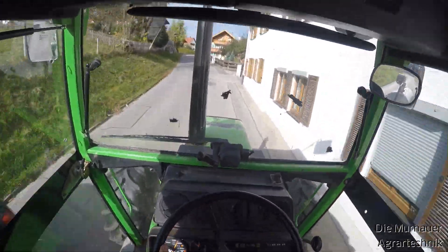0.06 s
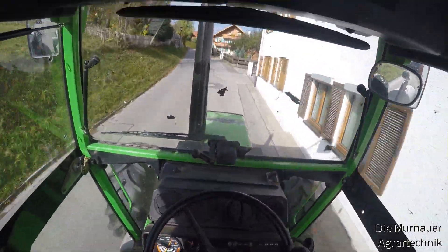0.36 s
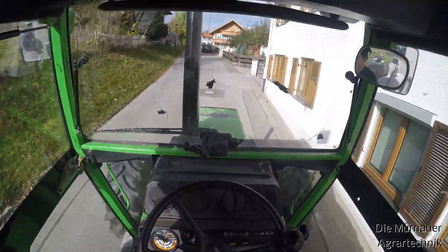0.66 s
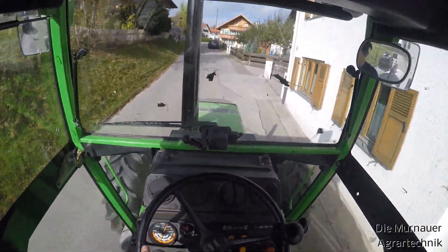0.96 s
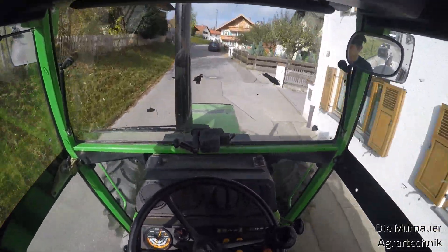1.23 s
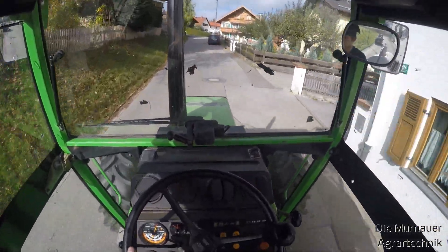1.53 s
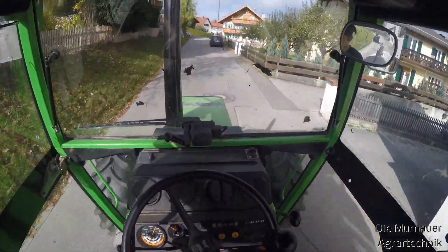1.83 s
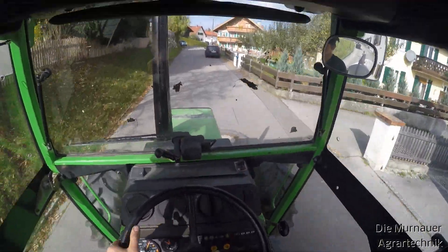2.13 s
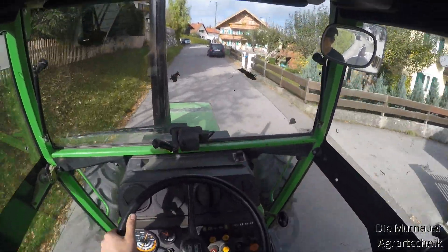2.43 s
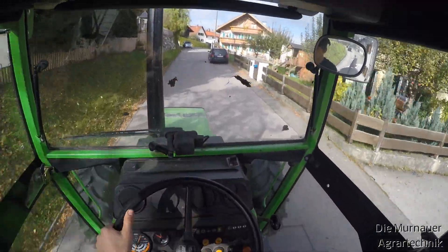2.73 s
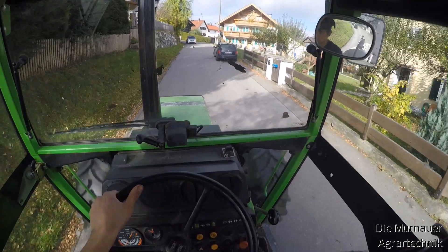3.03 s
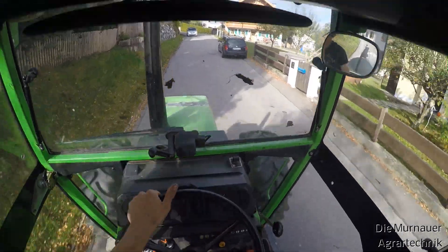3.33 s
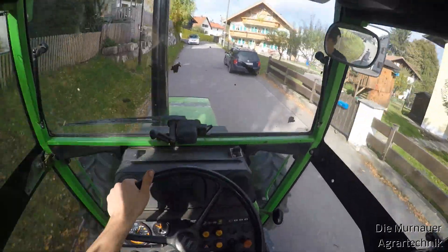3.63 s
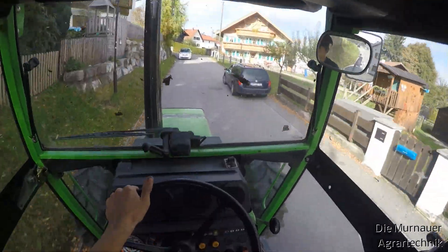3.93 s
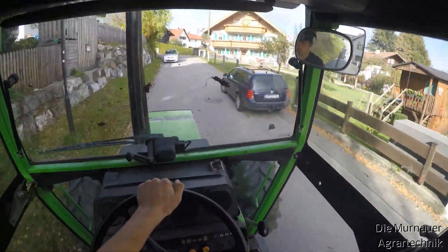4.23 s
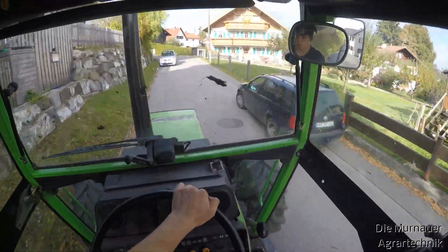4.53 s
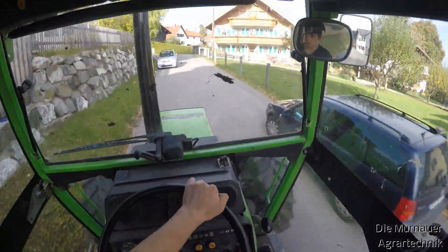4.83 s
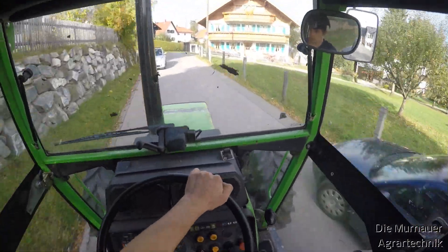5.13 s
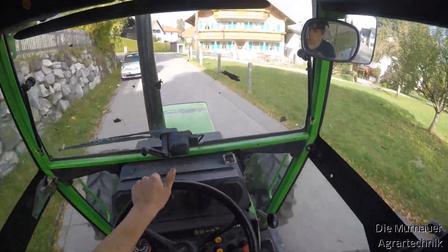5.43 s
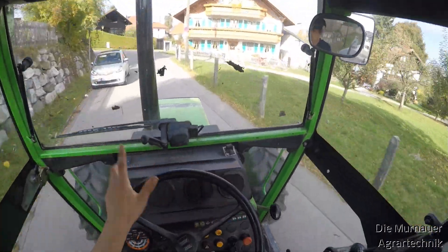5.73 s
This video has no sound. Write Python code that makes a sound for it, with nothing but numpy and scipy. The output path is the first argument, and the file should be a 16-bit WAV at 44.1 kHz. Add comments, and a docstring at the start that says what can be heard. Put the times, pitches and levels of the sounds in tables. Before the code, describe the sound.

A loud tractor diesel engine runs for the whole six seconds or so, heard from inside the cab while driving along a village road. It hums and booms low, with fast, even knocking, metallic clatter, gear hiss and a faint, high, pulsing spit on top. The throttle is steady; the pitch creeps up slightly until about 5 seconds, then sags a little. Underneath, the tyres make a very deep drone and the cab rumbles. Road bumps briefly break the drone and jolt the rumble during the first second, then around 3.2, 3.8, 4.4 and 4.8 seconds. Loose panels give faint, high, chattering tones that swell and fade now and then throughout. Four tiny bright clicks from small loose parts fall between about 4.1 and 5.3 seconds. From around 5 seconds the knocking and spitting soften while the drone carries on.

```python
"""Tractor cab on a village road.

Steady throttle. Tyre lugs pump the cab air into a deep drone, broken up by bumps.
The diesel hums, booms, thuds and clatters through the bulkhead; two bright spits alternate
in every engine cycle. Loose panels sing now and then; small parts click near the end."""
import sys
import numpy as np
from scipy import signal
from scipy.fft import rfft, irfft
from scipy.io import wavfile

SR = 44100
rng = np.random.default_rng(int(sys.argv[2]) if len(sys.argv) > 2 else 0)


def transcribe(signal):
    """Save signal, clipped to [-1, 1], as a 16-bit WAV file at the path in sys.argv[1]."""
    frames = np.atleast_2d(signal).T
    limited = np.clip(frames, -1, 1)
    pcm = np.round(limited * 32767).astype(np.int16)
    wavfile.write(sys.argv[1], SR, pcm)


N = 254898
T = np.arange(N) / SR
HZ = np.maximum(np.arange(N // 2 + 1) * SR / N, 1)


def undb(db):
    """Decibels to gain."""
    return 10 ** (np.asarray(db) / 20)


def unit(x):
    """Scale to rms 1."""
    return x / np.sqrt(np.mean(x ** 2))


def curves(table):
    """Each column after t/s, interpolated over time."""
    times, *columns = np.transpose(table)
    return [np.interp(T, times, column) for column in columns]


def swing(db):
    """Gain of a level curve relative to its median."""
    return undb(db - np.median(db))


def swell(at_s, width_s):
    """Gaussian rise and fall, peak 1."""
    return np.exp(-((T - at_s) / width_s) ** 2)


def walk(rate_hz):
    """Smooth random drift, rms 1."""
    return unit(irfft(rfft(rng.standard_normal(N)) * np.exp(-(HZ / rate_hz) ** 2), N))


def colour(x, spectrum):
    """Shape a white source of rms 1 to a spectral density, silent beyond its ends."""
    hz, db = np.transpose(spectrum)
    gain = undb(np.interp(np.log(HZ), np.log(hz), db, left=-np.inf, right=-np.inf))
    return irfft(rfft(x) * gain, N) * np.sqrt(SR / 2)


def ring(x, hz, width_hz):
    """Two equal resonators in series; white input of rms 1 gives unit density at the centre."""
    detune = (HZ / hz - hz / HZ) * hz / width_hz
    return irfft(rfft(x) / (1 + .64j * detune) ** 2, N) * np.sqrt(SR / 2)


def burst(cycles, phase, rise, fall, scatter_db):
    """One pulse of random strength per engine cycle; phase, rise and fall in cycles."""
    since = cycles - phase + 2
    strength = undb(scatter_db * rng.standard_normal(256))[since.astype(int)]
    age = since % 1
    shape = (1 - np.exp(-(age / rise) ** 2)) * np.exp(-age / fall)
    return strength * shape / shape.max()


def vibration(cycles, repeat):
    """White noise; the share `repeat` of its power recurs every engine cycle."""
    one_cycle = rng.standard_normal(3000)
    periodic = one_cycle[(cycles % 1 * len(one_cycle)).astype(int)]
    return np.sqrt(repeat) * periodic + np.sqrt(1 - repeat) * rng.standard_normal(N)


def cab_resonance(cycle_hz, order=14, centre_hz=214.7, half_width_hz=9.2, peak_db=6.5):
    """Lift in dB as one engine harmonic climbs into the resonance of the cab air."""
    return peak_db / (1 + ((order * cycle_hz - centre_hz) / half_width_hz) ** 2)


# Engine harmonics: multiple of the cycle rate, median level/dB
HUM = [(4, -39.5), (6, -49), (7, -55), (8, -42.5), (9, -47), (10, -47), (12, -49), (14, -41), (15, -55),
       (16, -50.5), (18, -49.5), (20, -50.5), (26, -59.5), (30, -56.5), (50, -58.5), (53, -57.5),
       (62, -60.5)]
def engine_hum(cycles, boom_db, cab_db, thud_db, growl_db):
    """Wavering harmonics; from low to high they follow boom, cab resonance, thud and growl."""
    bands = [(11, boom_db), (17, cab_db), (40, thud_db), (np.inf, 2 * growl_db)]
    out = 0
    for order, db in HUM:
        band_db = next(level for below_order, level in bands if order < below_order)
        angle = 2 * np.pi * (order * cycles + rng.random()) + .3 * walk(4)
        out += np.sqrt(2) * np.sin(angle) * undb(db + 1.6 * walk(4.1)) * swing(band_db)
    return out


# Exhaust spectrum: f/Hz, density/dB
BOOM = [(50, -96), (75, -63), (92, -65.5), (120, -59.5), (145, -67), (168, -64), (260, -120)]
def exhaust(cycles, boom_db):
    """Low boom that swells once per crank turn."""
    throb = unit(1 + .53 * np.cos(4 * np.pi * (cycles - .28)))
    return colour(throb * rng.standard_normal(N), BOOM) * swing(.36 * boom_db)


# Strength of the hardest knock: t/s, gain/dB
KNOCK_GAIN = [(0, -36), (.5, -38.5), (.8, -33), (2, -35.5), (3.5, -32.5), (4.8, -33), (5.78, -45)]
# Bulkhead modes: f/Hz, decay/s, relative level/dB
BULKHEAD = [(286.4, .0093, 0.5), (381.5, 0.011, -5.5), (452.6, .01, -8), (504, 0.0054, -5)]
def hard_knock(cycles, cycle_hz):
    """One cylinder strikes harder than the others and rings the bulkhead once per cycle."""
    gain_db, = curves(KNOCK_GAIN)
    age_s = (cycles - .84) % 1 / cycle_hz
    modes = sum(undb(db) * np.exp(-age_s / decay_s) * np.sin(2 * np.pi * hz * age_s)
                for hz, decay_s, db in BULKHEAD)
    attack = 1 - np.exp(-(age_s / .0017) ** 2)
    return modes * attack * undb(gain_db + 3.1 * walk(12))


# Knocks in one engine cycle: phase/cycles, relative level/dB
KNOCKS = [(.85, 6), (0.08, 1), (.37, 1), (.53, -4), (0.7, -6)]
def combustion(cycles):
    """Envelope of the uneven knocks, rms 1."""
    return unit(sum(undb(db) * burst(cycles, phase, rise=.012, fall=.11, scatter_db=1)
                    for phase, db in KNOCKS))


# Thud spectrum: f/Hz, relative density/dB
THUD = [(130, -92), (175, -70), (212, -60.5), (250, -66.5), (297, -66), (340, -71), (385, -69.5),
        (450, -71), (475, -76.5), (520, -71), (585, -88.5), (900, -112)]
def thud(cycles, knocks, thud_db):
    """Combustion knocks thud through the bulkhead."""
    return colour(knocks * vibration(cycles, repeat=.14), THUD) * swing(thud_db) * undb(.66)


# Rattle easing or flaring: t/s, width/s, change in the gears/dB
RATTLE_SHIFTS = [(.44, 0.025, -2.5), (0.813, 0.023, 1.5), (2.216, 0.028, 0), (2.365, 0.026, 3),
                 (2.73, 0.043, 1), (2.88, 0.086, -3), (3.06, 0.059, 2), (3.88, 0.022, -2), (4.1, 0.051, 2),
                 (4.248, 0.07, -2.5)]
def rattle_levels(growl_db):
    """Metal and gear levels in dB: both waver and flare, the gears also follow the load."""
    shift_db = .5 * walk(8.2)
    shift_db += sum(db * swell(at_s, width_s) for at_s, width_s, db in RATTLE_SHIFTS)
    return .39 * shift_db, shift_db + .46 * growl_db


# Gear hiss spectrum: f/Hz, density/dB
GEAR_HISS = [(400, -80), (1400, -86), (4000, -79), (5000, -91), (7000, -90), (8200, -91.5), (9000, -96),
             (10200, -95.5), (11600, -103), (13000, -103), (15000, -106)]
# Modes of block, bonnet and glass: f/Hz, width/Hz, density/dB
BODY_MODES = [(636, 45, -75.5), (748, 85, -72), (952, 213, -73.5), (1114, 174, -76), (1233, 94, -70.5),
              (1346, 50, -72), (1619, 118, -72), (1773, 256, -72.5), (1913, 146, -72.5), (2058, 174, -74.5),
              (2358, 107, -70.5), (2630, 212, -69), (2780, 69, -70.5), (2938, 32, -69.5),
              (3222, 280, -72.5), (3512, 230, -73.5), (3567, 200, -70), (3813, 150, -70), (4380, 216, -78),
              (4700, 300, -83.5), (5405, 220, -79), (5582, 89, -76), (6145, 280, -85.5), (7850, 260, -90)]
def clatter(cycles, knocks, growl_db, metal_db, gears_db):
    """Engine vibration, pulsing faintly with the knocks, rings the metal over the hiss of gears."""
    drive = unit(1 + .051 * knocks) * undb(.94 * walk(84))
    out = colour(drive * rng.standard_normal(N), GEAR_HISS) * swing(gears_db)
    for hz, width_hz, db in BODY_MODES:
        regular = 1 / (1 + (hz / 1100) ** 4)  # low modes ring more alike from cycle to cycle
        rattle_db = metal_db if hz < 3100 else gears_db
        load_db = regular * growl_db + (1 - regular) * rattle_db
        gain = swing(load_db) * undb(db + .94 * walk(13))
        out += gain * ring(drive * vibration(cycles, repeat=.19 + .34 * regular), hz, width_hz)
    return out


# Spit strength: t/s, gain/dB
SPIT_GAIN = [(0, 0.5), (1, 0.5), (3, 1.5), (4.4, 0), (4.9, -3.5), (5.05, -8.5), (5.78, -10)]
# Spectra of the two spits: f/Hz, relative density/dB
HIGH_SPIT = [(7000, -115), (9400, -100), (10300, -86), (11000, -91.5), (11850, -97), (12600, -88),
             (13200, -88.5), (14000, -97), (14600, -98), (15500, -99)]
LOW_SPIT = [(5000, -110), (8300, -91), (9300, -85.5), (10000, -81.5), (10700, -90), (11800, -101),
            (12700, -100), (15000, -115)]
def spits(cycles):
    """Two sharp hissing spits, one crank turn apart, each with its own colour."""
    gain_db, = curves(SPIT_GAIN)
    high = burst(cycles, phase=.83, rise=.064, fall=.24, scatter_db=1.4)
    high *= colour(rng.standard_normal(N), HIGH_SPIT)
    low = burst(cycles, phase=.33, rise=.058, fall=.25, scatter_db=1.35)
    low *= colour(rng.standard_normal(N), LOW_SPIT)
    return (high + low) * undb(gain_db + .5 + 1.3 * walk(250))


# Road bumps: t/s, width/s, drone loss/dB, shake change/dB
BUMPS = [(0, 0.055, 13, 4), (0.254, 0.043, 12, -9), (0.442, 0.043, 7, 8), (.74, 0.071, 10, -0.5),
         (3.127, 0.035, 11, 5.5), (3.23, 0.052, 23, -1.5), (3.402, 0.059, 3, 5.5), (3.81, 0.073, 21, 5),
         (4.447, 0.046, 6, 3), (4.784, 0.15, 5.5, 2)]
def road_bumps(jolt_delay_s=.046, rebound_delay_s=.15):
    """Each bump unloads the tyres and jolts the cab; the tyres land again and press harder."""
    drone_db, shake_db = -14.5 + 1.3 * walk(6.7), .5
    for at_s, width_s, loss_db, jolt_db in BUMPS:
        rebound = .21 * swell(at_s + rebound_delay_s, .07)
        drone_db -= loss_db * (swell(at_s, width_s) - rebound)
        shake_db += jolt_db * swell(at_s + jolt_delay_s, .12)
    return drone_db, shake_db


# Cab shake spectrum: f/Hz, relative density/dB
SHAKE = [(6, -71), (12, -39), (19, -39.5), (30, -40), (45, -44), (58, -49.5), (75, -65), (110, -66),
         (300, -100)]
def tyres(cycles, drone_db, shake_db, lugs_per_cycle=1.73):
    """Lugs striking the road pump the cab air; the road shakes the whole cab."""
    angle = 2 * np.pi * lugs_per_cycle * cycles + .14 * walk(6.3)
    drone = np.sqrt(2) * np.sin(angle) * undb(drone_db)
    return drone + colour(rng.standard_normal(N), SHAKE) * undb(shake_db)


# Panel tones: t/s, length/s, f/Hz, relative level/dB
PANEL_TONES = [(.05, 0.12, 2630, -47), (0.336, 0.17, 2630, -40.5), (0.804, 0.063, 2540, -48),
               (0.806, .07, 2690, -40.5), (0.827, .08, 3170, -45), (1.076, 0.16, 3810, -43),
               (1.457, 0.33, 2920, -43.5), (1.942, 0.12, 2920, -40), (2.243, 0.14, 2990, -40.5),
               (2.65, 0.066, 2240, -37.5), (2.697, 0.15, 3850, -41), (3.05, 0.12, 3810, -42),
               (3.273, 0.12, 2700, -41.5), (3.672, 0.12, 2935, -40), (4.146, 0.11, 3030, -41),
               (4.476, 0.11, 2760, -43), (4.76, .12, 2760, -43), (5.182, 0.098, 2600, -41),
               (5.29, 0.069, 2630, -36), (5.736, 0.076, 2660, -43)]
def panels():
    """Chattering tones swell and fade as the vibration catches a loose panel."""
    waver_rad = .7 * walk(40)
    chatter = unit(undb(3.5 * walk(45)))
    out = 0
    for at_s, length_s, hz, db in PANEL_TONES:
        tone = np.sqrt(2) * np.sin(2 * np.pi * hz * T + waver_rad)
        out += undb(db) * swell(at_s, length_s) ** 2 * tone
    return out * chatter * undb(-2.4)


# Clicks: t/s, level/dB
CLICKS = [(4.1, -45), (4.495, -44), (4.885, -49), (5.335, -52)]
def clicks(decay_s=.0065):
    """Small loose parts give tiny bright clicks."""
    envelope = sum(undb(db) * (T >= at_s) * np.exp(-np.abs(T - at_s) / decay_s) for at_s, db in CLICKS)
    return envelope * unit(ring(rng.standard_normal(N), hz=10100, width_hz=670))


# Engine speed, two crank turns per cycle: t/s, cycle rate/Hz
SPEED = [(0, 14.69), (.3, 14.464), (1.5, 14.665), (1.8, 14.884), (2.7, 15.098), (3, 15.403), (3.3, 15.222),
         (3.9, 15.294), (4.4, 15.473), (5.2, 15.485), (5.78, 15.026)]
# Engine load as relative levels: t/s, exhaust boom/dB, thud/dB, block growl/dB
LOAD = [(0, -33.5, -37.5, -1), (.7, -38, -41, -0.5), (1.3, -34, -40, 1.5), (2.6, -39, -42.5, 1),
        (3.5, -40, -40.5, 0), (4.6, -41.5, -42, 0.5), (5.2, -40, -45, -1.5), (5.78, -37, -47, -1.5)]
def scene():
    """Engine and wheels are geared together: one shaft angle times both."""
    cycle_hz, = curves(SPEED)
    boom_db, thud_db, growl_db = curves(LOAD)
    cycles = .176 + np.cumsum(cycle_hz) / SR
    engine = engine_hum(cycles, boom_db, cab_resonance(cycle_hz), thud_db, growl_db)
    engine += exhaust(cycles, boom_db) + hard_knock(cycles, cycle_hz)
    metal_db, gears_db = rattle_levels(growl_db)
    knocks = combustion(cycles)
    engine += thud(cycles, knocks, thud_db)
    engine += clatter(cycles, knocks, growl_db, metal_db, gears_db) + spits(cycles)
    drone_db, shake_db = road_bumps()
    return (engine + clicks() + tyres(cycles, drone_db, shake_db) + panels())[None]


def record(dry):
    """Steep low-pass at 15.2 kHz."""
    return signal.sosfilt(signal.ellip(10, .2, 70, 15200, fs=SR, output="sos"), dry)


dry = scene()
out = record(dry)
transcribe(out)
```